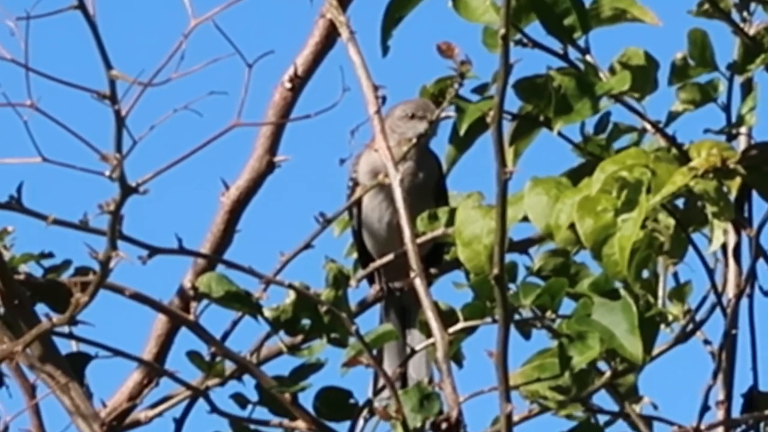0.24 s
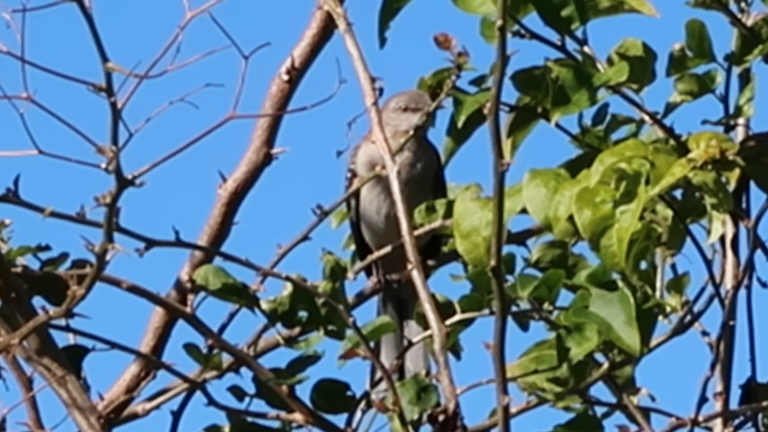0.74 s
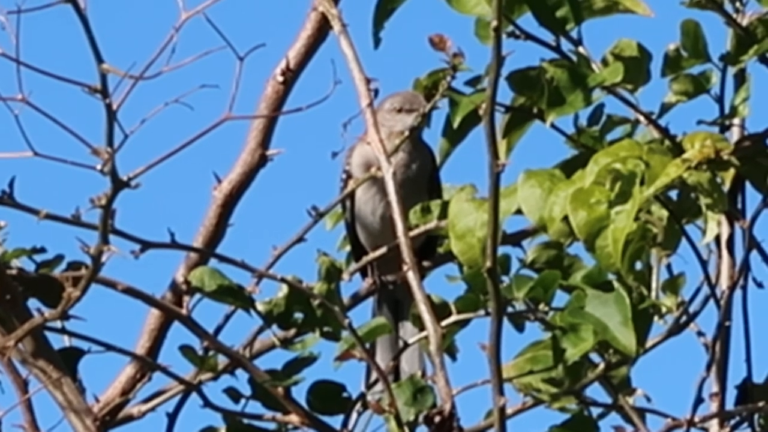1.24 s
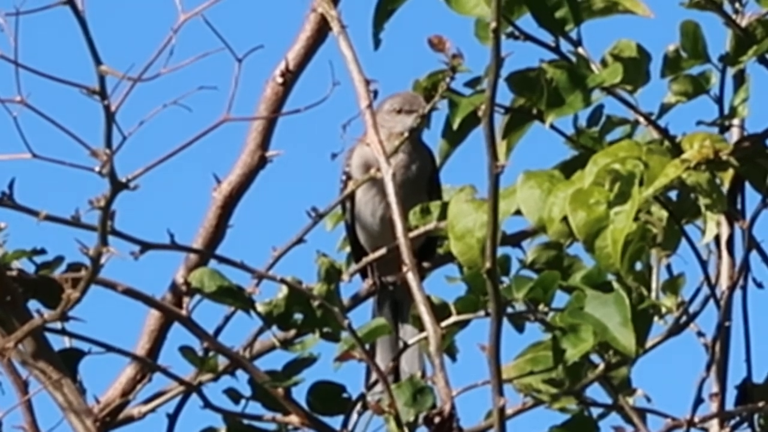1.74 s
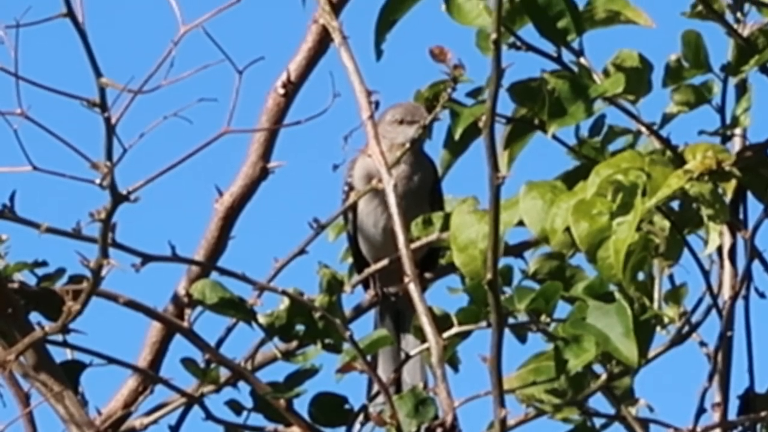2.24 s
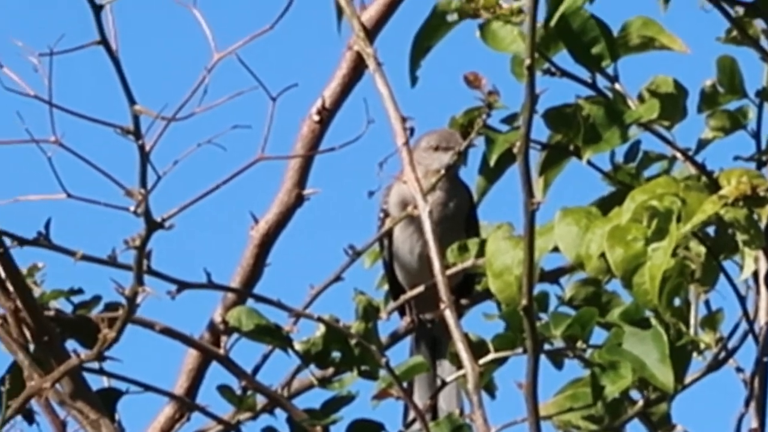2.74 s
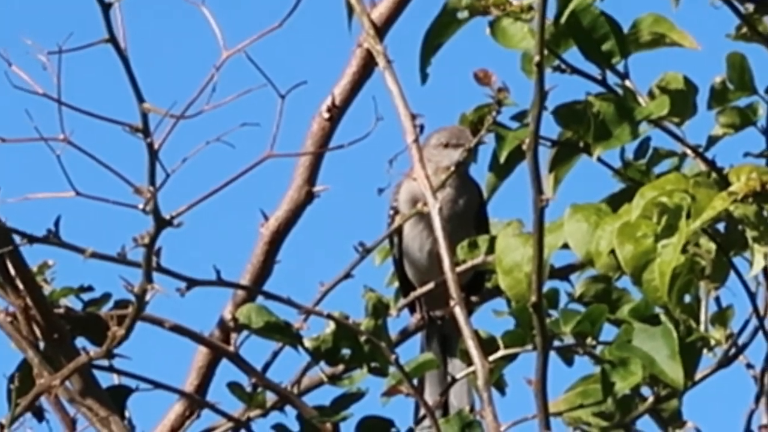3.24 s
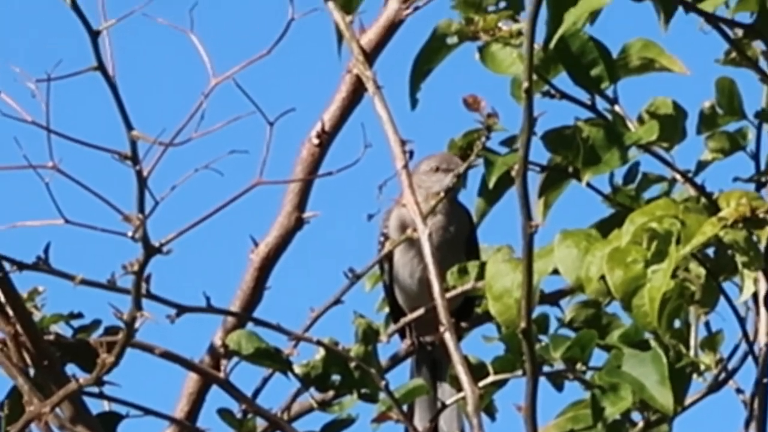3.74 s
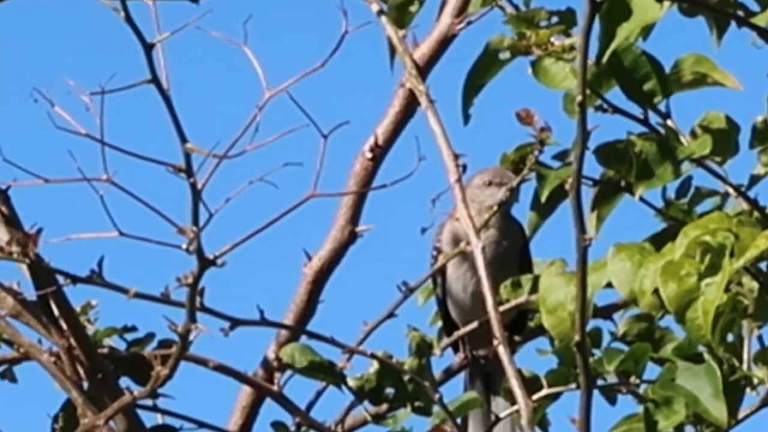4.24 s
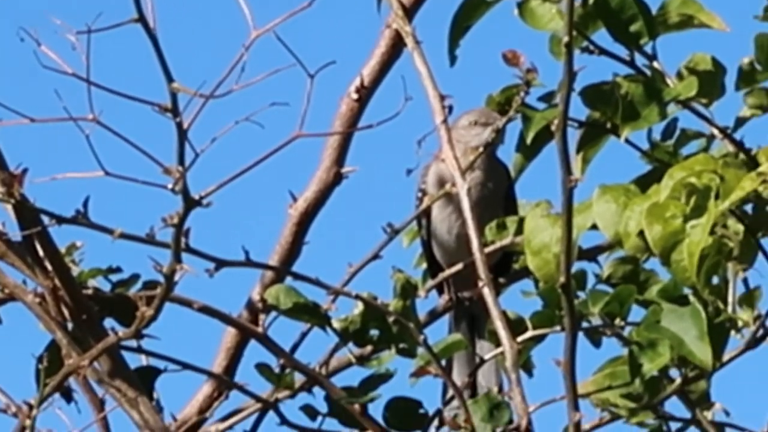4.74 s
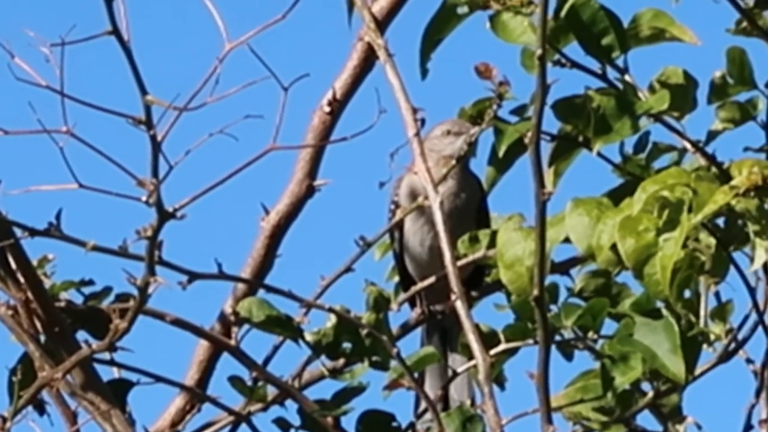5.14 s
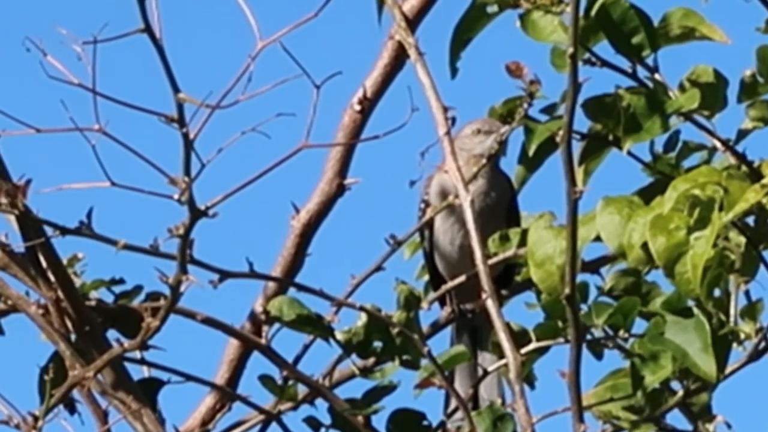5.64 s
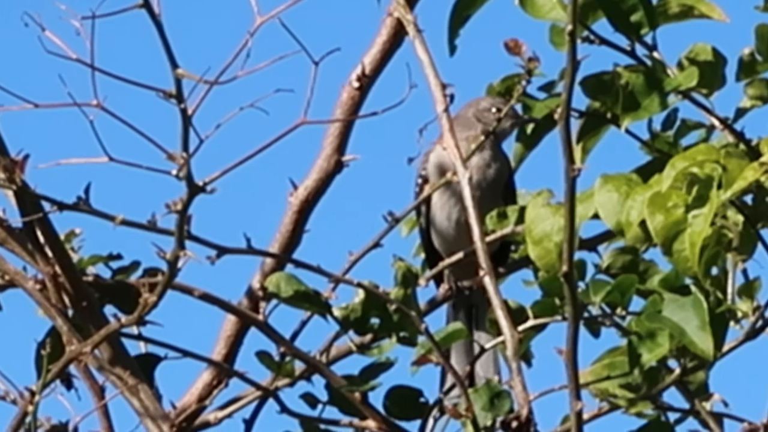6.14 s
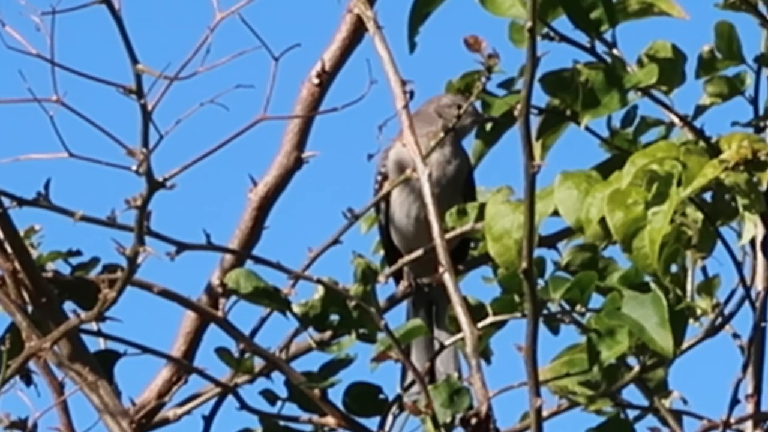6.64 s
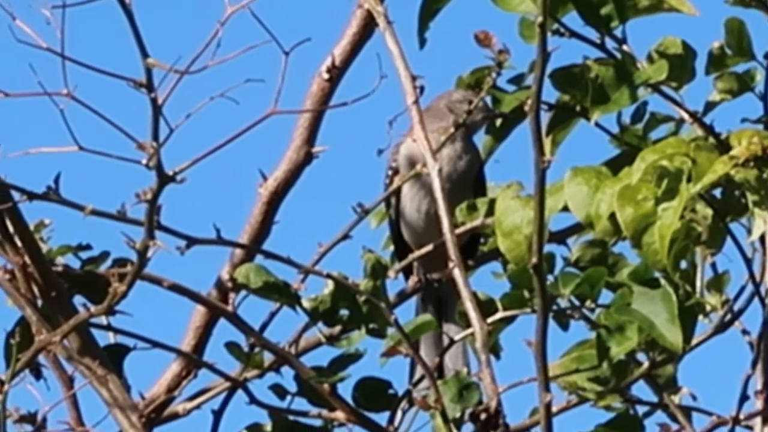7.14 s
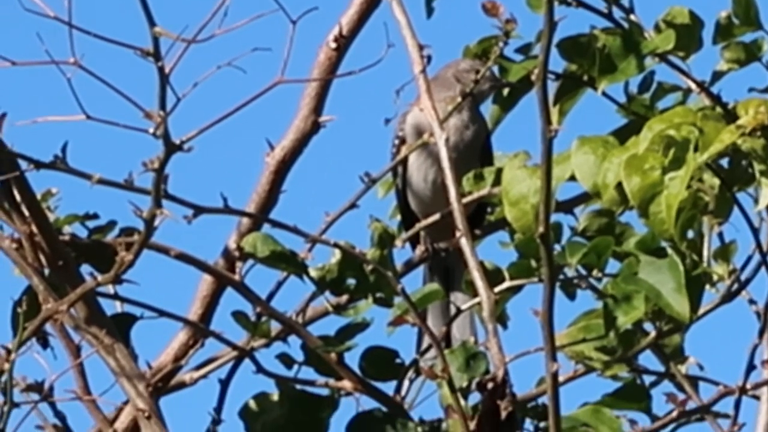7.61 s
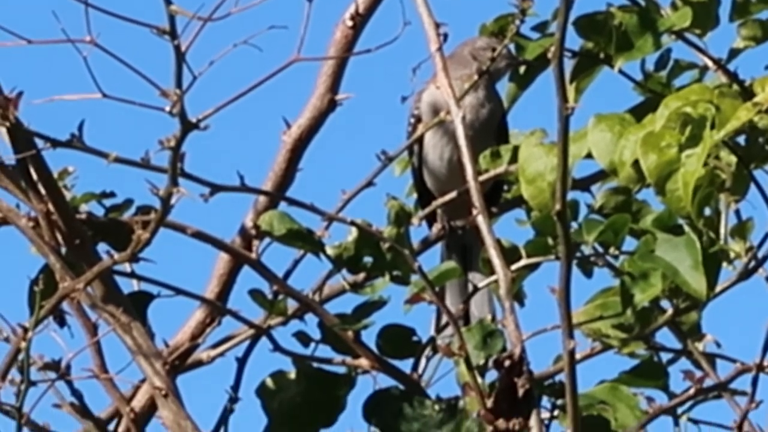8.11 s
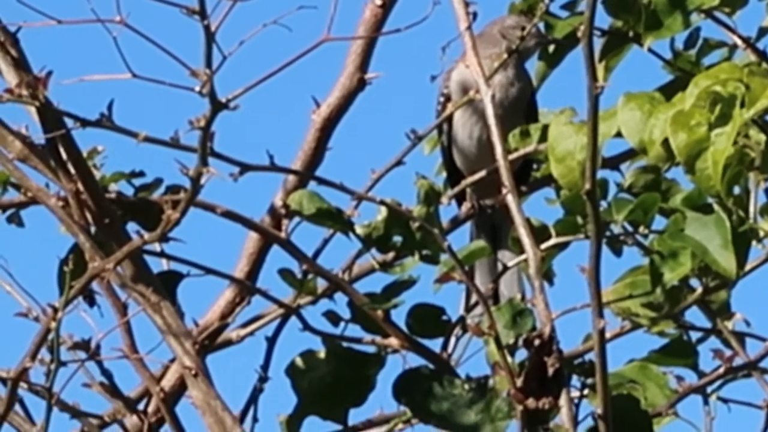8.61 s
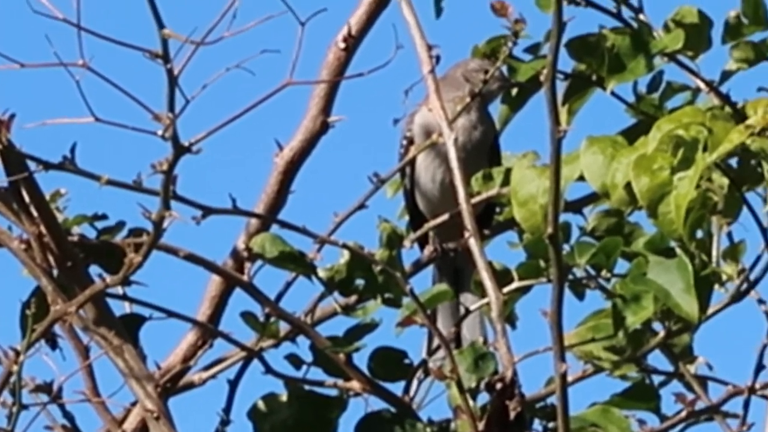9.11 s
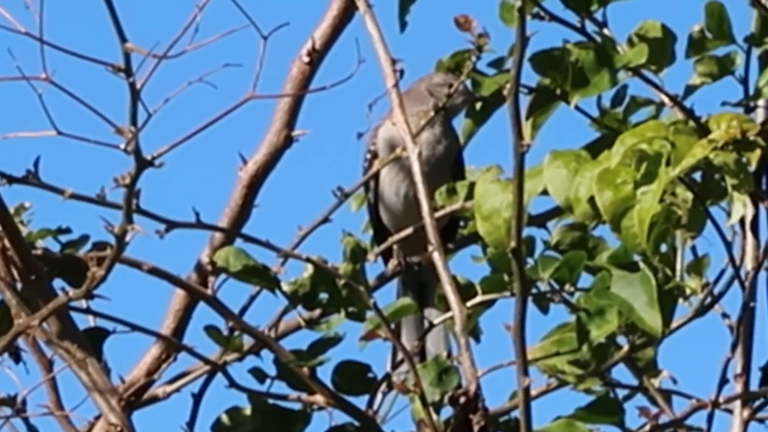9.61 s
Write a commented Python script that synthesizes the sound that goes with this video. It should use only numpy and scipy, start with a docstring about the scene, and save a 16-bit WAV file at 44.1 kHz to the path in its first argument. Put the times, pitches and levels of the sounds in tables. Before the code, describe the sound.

A distant piston aircraft drones low in open air, swelling and fading in uneven waves over faint town rumble, soft hiss and far tyre wash.

```python
"""A far piston engine, perhaps a light aircraft, drones in open air among bushes: shaft-order tones plus
exhaust noise, slowly sinking in pitch, swelling and fading as the air bends its sound.
A fixed machine hums in steady lines and casing rings; a higher far motor fades, a deeper one grows.
Shaped noise gives a town's rumble, a soft hiss and a wash of tyres, with short faint narrow-band bursts.
Two tiny chips are rustle around a tone; a thin electronic whine is a high pulsing tone."""
import sys
import numpy as np
from scipy import signal
from scipy.fft import rfft, irfft, next_fast_len
from scipy.io import wavfile
from scipy.ndimage import uniform_filter1d

SR = 44100
rng = np.random.default_rng(int(sys.argv[2]) if len(sys.argv) > 2 else 0)


def wav_out(sig):
    """Save sig, one row per channel (or a flat mono array), as 16-bit PCM at SR to the path in sys.argv[1]."""
    wavfile.write(sys.argv[1], SR, np.round(np.clip(np.atleast_2d(sig).T, -1, 1) * 32767).astype(np.int16))


N = 435266
TIME_S = np.arange(N) / SR
OPPOSED = np.array([[1], [-1]])  # left, right

# exhaust rasp lines: shaft_order, level_re_rasp_db
RASP_LINES = [(5, -1.5), (6, 0.5), (7, -7.5), (8, -28)]
# rough exhaust noise: freq_hz, density_re_roar_db_per_hz
EXHAUST_SPECTRUM = [(120, -35), (220, -23), (300, -11), (380, -22), (470, -18.5), (540, -31.5),
                    (1300, -39.5), (2500, -60)]
# engine swells carried over by the air: centre_s, half_width_s, firing_rise_db, third_order_rise_db,
# fourth_order_rise_db, rasp_rise_db, roar_rise_db
ENGINE_SWELLS = [(.08, 0.25, 6.5, 5.5, 6.5, 15.5, 1), (.53, 0.27, 9.5, 7, 11.5, 19, 3.5),
                 (1.02, 0.27, 7.5, -1, 5.5, 10.5, 4.5), (1.33, 0.2, 0, 3.5, 6, 12, 3),
                 (1.76, 0.26, 5.5, 2.5, 7, 9.5, 1), (2.15, 0.25, 5.5, 5, 10.5, 17, 9.5),
                 (2.7, 0.3, 5, 3, 2.5, 3, -2), (3.23, 0.3, 6, 5.5, 5, 3, 0), (3.95, 0.27, 7, 5, 5.5, 2, 1),
                 (4.52, 0.24, 2.5, 4, 9, 8, -7), (4.88, 0.17, 1, 0, 0, -8, -6),
                 (5.28, 0.39, 10, 10, 12.5, 7.5, 8), (5.92, 0.23, 2, -2, 7, -2, 2),
                 (6.48, 0.4, 4, -3, 4, -7, -3.5), (7.13, 0.15, 4, 6.5, 3, 0, 0),
                 (7.68, 0.39, 8, 9.5, 12.5, 2, 3.5), (8.18, 0.2, 4, 6, -3, 4, 2.5),
                 (8.6, 0.34, 4.5, 1, 1, 4, 7), (8.85, 0.155, -2, 2, 8, 5, -1.5),
                 (9.66, 0.26, 2.5, 1, 6, -4, -3)]
# deeper far motor, drawing near in surges: time_s, level_db
DEEP_MOTOR_LEVEL = [(0, -68), (2, -56), (3.9, -60), (5.5, -50), (6.4, -56), (7.15, -50), (7.9, -50),
                    (8.6, -47), (9.1, -49.5), (9.87, -48)]
# fixed machine with a fan: freq_hz, level_db
MACHINE_LINES = [(59.9, -62), (90, -64), (143.8, -63), (269.6, -68), (348.6, -62), (449.3, -74), (638, -76)]
# casing singing in the fan's draught: freq_hz, width_hz, level_db (mean of left and right)
CASING_RINGS = [(1145, 18, -75), (1254, 130, -72), (1416, 26, -76.5), (1649, 39, -71), (1682, 72, -74.5)]
# outdoor background common to both sides: freq_hz, density_db_per_hz
AIR_COMMON_SPECTRUM = [(15, -83), (42, -75), (62, -69), (105, -72), (200, -75.5), (400, -81.5),
                       (540, -86.5), (750, -89.5), (1100, -91.5), (1700, -93.5), (2200, -96), (2800, -97.5),
                       (3400, -97.5), (4000, -100.3), (5000, -103.5), (10000, -113.5), (13000, -118)]
# outdoor background opposed between the sides: freq_hz, density_db_per_hz
AIR_OPPOSED_SPECTRUM = [(15, -108), (40, -99), (105, -81), (240, -76), (450, -78), (530, -83),
                        (1000, -89.5), (1600, -94), (2300, -97.5), (4000, -100), (5000, -103.5),
                        (10000, -113), (13000, -116)]
# far traffic wash, before trim and balance: time_s, level_db
WASH_LEVEL = [(.3, -62), (2.5, -63.5), (3.3, -60), (4.45, -62.5), (5.3, -59), (6.05, -63.5), (6.65, -59),
              (7.5, -63.5), (8.15, -60), (8.95, -60.5), (9.6, -61.5)]
# colour of the wash, before it is normalised: freq_hz, density_db_per_hz
WASH_SPECTRUM = [(400, -101), (650, -94), (1250, -91), (1800, -99), (3000, -110)]
# flicker of the background in small patches of pitch and time: freq_hz, depth_db
FLICKER_DEPTH = [(300, 1), (650, 2.6), (1400, 2.4), (2600, 1.7)]
# short faint bursts of narrow-band noise: centre_s, pitch_hz, peak_level_db, half_width_s
NOISE_BURSTS = [(.16, 900, -61, 0.037), (.48, 680, -63, .05), (.73, 750, -65, .04), (1.05, 825, -69, 0.054),
                (2.42, 700, -62, 0.062), (4.95, 576, -63, 0.059), (5.36, 1324, -65, .1),
                (6.22, 726, -77, .04), (7.32, 694, -64, 0.046), (8.12, 1230, -65, 0.11),
                (8.63, 690, -67, 0.044), (9.08, 740, -63, .04), (9.65, 614, -57, 0.041)]
# high chips, perhaps a small bird: centre_s, pitch_hz, pitch_swing_hz, peak_level_db, half_length_s,
# roughness_0_to_1
CHIP_EVENTS = [(5.527, 5400, 100, -64.5, .009, .92), (6.9357, 4950, 350, -57.5, .0026, .25)]

SHAFT_START_HZ, SHAFT_SAG_HZ_PER_S = 61.74, .24
# levels between swells: at the start, then change per second
FIRING_START_DB, FIRING_DB_PER_S = -42, -0.41
THIRD_START_DB, THIRD_DB_PER_S = -56.5, -0.49
FOURTH_START_DB, FOURTH_DB_PER_S = -55, -0.66
ROAR_DB, RASP_DB = -69, -73
OCTAVE_LAG_RAD = .9
SWELL_FLATNESS = 2.73  # 2 is a bell; more holds the top and falls faster
DEEP_HZ, HIGHER_HZ = 76.65, 157.6
HIGHER_START_DB, HIGHER_DB_PER_S = -52.5, -2.3
MOTOR_SWELL_SHARE = 0.49  # of the firing tone's rise in dB, for the higher motor
WASH_TRIM_DB = -0.05
RUFFLE_DB, RUFFLE_STEPS_PER_S = 2.5, 9
BURST_BAND_HZ = 38
WHINE_HZ, WHINE_CARRIER_DB, WHINE_PULSE_HZ = 13007, -87.5, 30
TOP_HZ = 14500


def undb(db):
    """Decibels to gain."""
    return 10 ** (np.asarray(db) / 20)


def level_curve(table):
    """Level points joined by straight lines in time."""
    time_s, level_db = np.transpose(table)
    return np.interp(TIME_S, time_s, level_db)


def trend(start_db, db_per_s):
    """A level that changes steadily with time."""
    return start_db + db_per_s * TIME_S


def walk(steps_per_s):
    """Smooth random drift with a spread near 1."""
    step = int(SR / steps_per_s)
    held = np.repeat(rng.standard_normal(N // step + 2), step)
    smooth = uniform_filter1d(uniform_filter1d(held, step), step)
    return 1.3 * smooth[:N]


def noise(spectrum):
    """Noise shaped in dB per Hz, straight between points over log pitch."""
    hz, density_db = np.transpose(spectrum)
    size = next_fast_len(N, True)
    octave = np.log2(np.maximum(np.fft.rfftfreq(size, 1 / SR), 1))
    shape_db = np.interp(octave, np.log2(hz), density_db)
    shape_db -= 60 * np.maximum(octave - np.log2(hz[-1]), 0)  # 60 dB/octave above the last point
    white = rfft(rng.standard_normal(size))
    return irfft(white * undb(shape_db) * np.sqrt(SR / 2), size)[:N]


def resonance(hz, width_hz):
    """Noise ringing in one resonance, rms 1."""
    ring = signal.lfilter(*signal.iirpeak(hz, hz / width_hz, fs=SR), rng.standard_normal(N))
    return ring / ring.std()


def tone(hz, waver):
    """A line of rms near 1 whose level and phase waver."""
    phase = 2 * np.pi * (np.cumsum(hz * np.ones(N)) / SR + rng.random())
    level = np.sqrt(2) * np.exp(waver * walk(7))
    return level * np.sin(phase + waver * walk(5.1))


def bell(centre_s, half_width_s):
    """Gaussian envelope in time, peak 1."""
    return np.exp(-.5 * ((TIME_S - centre_s) / half_width_s) ** 2)


def band_pass(x, edges_hz):
    """Keep one band of pitch."""
    return signal.sosfilt(signal.butter(2, edges_hz, "band", fs=SR, output="sos"), x)


def from_right(x, lag_samples):
    """Sound from the right reaches the left side late."""
    left = np.interp(TIME_S - lag_samples / SR, TIME_S, x)
    return np.array([left, x])


def swells():
    """Propagation swells: flat-topped bells summed in dB for firing, third, fourth, rasp and roar."""
    total_db = 0
    for centre_s, half_width_s, *rises_db in ENGINE_SWELLS:
        shape = np.exp(-np.abs((TIME_S - centre_s) / half_width_s) ** SWELL_FLATNESS)
        total_db = total_db + np.array(rises_db)[:, None] * shape
    return total_db


def engine(firing_rise_db, third_rise_db, fourth_rise_db, rasp_rise_db, roar_rise_db):
    """Two firings a turn make the main tone; unequal cylinders add the odd orders, and the exhaust rasps."""
    shaft_hz = SHAFT_START_HZ - SHAFT_SAG_HZ_PER_S * TIME_S
    firing_db = trend(FIRING_START_DB, FIRING_DB_PER_S) + firing_rise_db
    third_db = trend(THIRD_START_DB, THIRD_DB_PER_S) + third_rise_db
    fourth_db = trend(FOURTH_START_DB, FOURTH_DB_PER_S) + fourth_rise_db

    firing_phase = 2 * np.pi * (np.cumsum(2 * shaft_hz) / SR + rng.random()) + 0.044 * walk(7.0)
    drone = np.sqrt(2) * undb(firing_db + 0.48 * walk(8)) * np.cos(firing_phase)
    # octave crests just after each firing: pressure rises slowly, drops fast
    octave_phase = 2 * firing_phase - OCTAVE_LAG_RAD + 0.24 * walk(2.55)
    drone += np.sqrt(2) * undb(fourth_db + 0.48 * walk(9.6)) * np.cos(octave_phase)
    # weaker orders arrive by mixed paths and flutter freely
    drone += undb(third_db) * tone(3 * shaft_hz, waver=.1)
    rasp = sum(undb(db) * tone(order * shaft_hz, waver=0.19) for order, db in RASP_LINES)
    drone += undb(RASP_DB + rasp_rise_db) * rasp

    # roar also returns from the surroundings, unlike on each side
    roar = noise(EXHAUST_SPECTRUM) + undb(-9) * OPPOSED * noise(EXHAUST_SPECTRUM)
    return from_right(drone, lag_samples=1.3) + undb(ROAR_DB + roar_rise_db) * roar


def motors(firing_rise_db):
    """A higher drone dies away, swelling a little with the engine, while a deeper one draws near."""
    deep = undb(level_curve(DEEP_MOTOR_LEVEL)) * tone(DEEP_HZ, waver=0.049)
    higher_db = trend(HIGHER_START_DB, HIGHER_DB_PER_S) + MOTOR_SWELL_SHARE * firing_rise_db
    return deep + undb(higher_db) * tone(HIGHER_HZ, waver=0.09)


def machine():
    """Steady motor and fan lines, and the faint ring of the casing, stronger on the right."""
    hum = sum(undb(db) * tone(hz, waver=0.079) for hz, db in MACHINE_LINES)
    casing = sum(undb(db) * resonance(hz, width_hz) for hz, width_hz, db in CASING_RINGS)
    return hum + casing * undb(-1.5 * OPPOSED)


def air():
    """Town rumble and diffuse hiss: noise common to both sides plus noise opposed between them."""
    return noise(AIR_COMMON_SPECTRUM) + OPPOSED * noise(AIR_OPPOSED_SPECTRUM)


def traffic(band_count=16):
    """Far tyre wash comes and goes on the breeze, a little to the right; gusts ruffle each band apart."""
    tyres = np.array([noise(WASH_SPECTRUM) for _ in range(2)])
    edges_hz = np.geomspace(WASH_SPECTRUM[0][0], WASH_SPECTRUM[-1][0], band_count + 1)
    sides = 0
    for band_hz in zip(edges_hz, edges_hz[1:]):
        shifted = np.roll(tyres, rng.integers(N), axis=1)  # decorrelates the bands
        sides = sides + band_pass(shifted, band_hz) * undb(RUFFLE_DB * walk(RUFFLE_STEPS_PER_S))
    level_db = WASH_TRIM_DB + level_curve(WASH_LEVEL) - .9 * OPPOSED
    return sides / sides.std() * undb(level_db)


def flicker(x, size=1024):
    """Coarse grain in a wash: each narrow band flutters on its own at near-constant mean power."""
    hz, _, bands = signal.stft(x, fs=SR, nperseg=size)
    chance = rng.standard_normal(bands.shape[1:])
    chance = uniform_filter1d(chance, size=3, axis=0)  # over pitch
    chance = uniform_filter1d(chance, size=4, axis=1)  # over time
    depth_db = np.interp(hz, *np.transpose(FLICKER_DEPTH))[:, None]
    gain = undb(depth_db * chance / chance.std())
    gain /= np.sqrt(np.mean(gain ** 2, axis=1, keepdims=True))
    return signal.istft(bands * gain, nperseg=size)[1][:, :N]


def electronic_whine():
    """A thin, high tone whose level pulses steadily."""
    pulse = 1 + .8 * np.cos(2 * np.pi * WHINE_PULSE_HZ * TIME_S)
    return undb(WHINE_CARRIER_DB) * pulse * tone(WHINE_HZ, waver=.05)


def noise_bursts():
    """Short faint bursts of narrow-band noise: resonant noise under bell envelopes."""
    out = np.zeros(N)
    for centre_s, hz, db, half_width_s in NOISE_BURSTS:
        out += undb(db) * bell(centre_s, half_width_s) * resonance(hz, BURST_BAND_HZ)
    return out


def chips(width_hz=800):
    """Each chip is a few milliseconds of narrow, high rustle around a tone that flicks upward."""
    out = np.zeros(N)
    for centre_s, hz, swing_hz, db, half_length_s, roughness in CHIP_EVENTS:
        pitch_hz = hz + swing_hz * np.tanh((TIME_S - centre_s) / half_length_s)
        whistle = np.sqrt(2) * np.sin(2 * np.pi * np.cumsum(pitch_hz) / SR)
        share = np.clip(roughness, 0, 1)  # of the power
        mix = np.sqrt(1 - share) * whistle + np.sqrt(share) * resonance(hz, width_hz)
        out += undb(db) * bell(centre_s, half_length_s) * mix
    return out


def scene():
    """Sum of all outdoor sources, left and right."""
    rises_db = swells()
    sources = engine(*rises_db) + motors(rises_db[0]) + machine()
    background = flicker(air() + traffic())
    return sources + background + noise_bursts() + chips()


def record(dry):
    """Add the electronic whine, then cut the top with a steep elliptic low-pass."""
    low_pass = signal.ellip(8, .2, 70, TOP_HZ, fs=SR, output="sos")  # 0.2 dB ripple, 70 dB stop
    return signal.sosfilt(low_pass, dry + electronic_whine())


dry = scene()
out = record(dry)
wav_out(out)
```